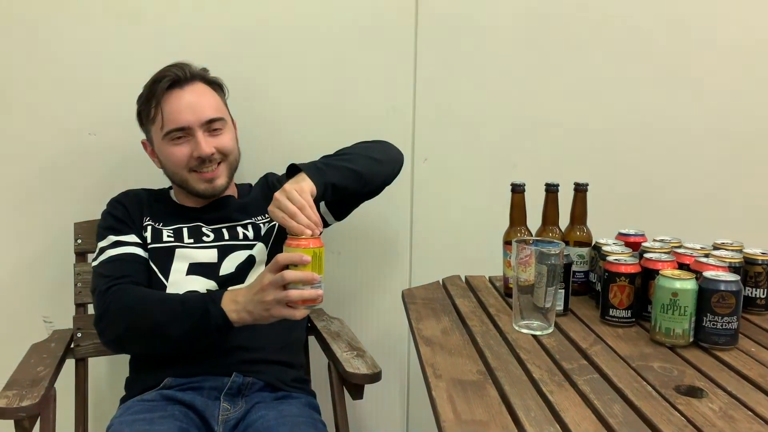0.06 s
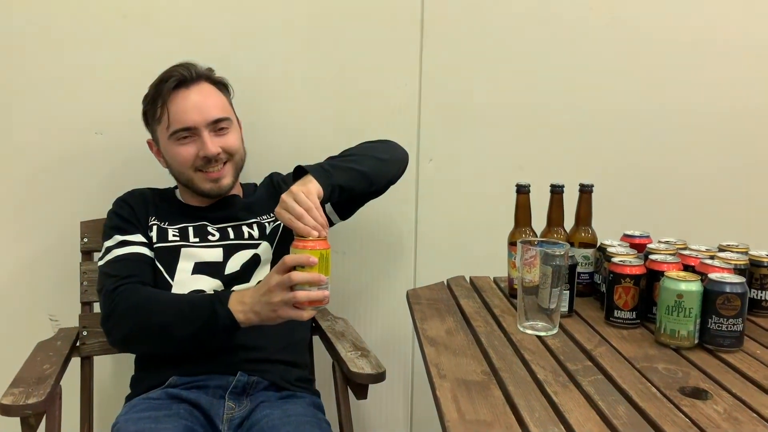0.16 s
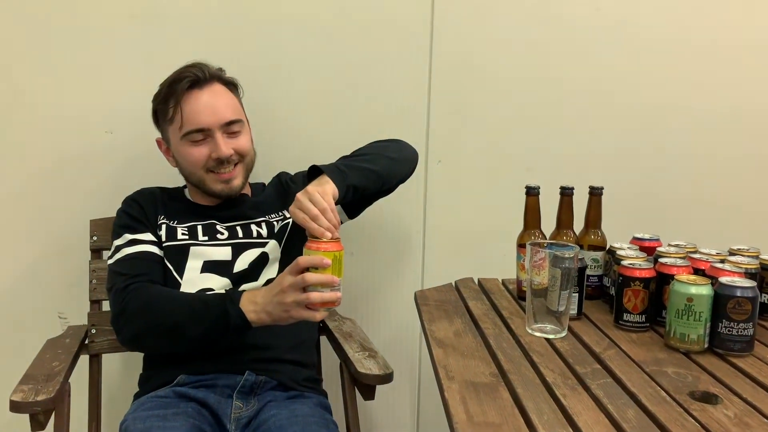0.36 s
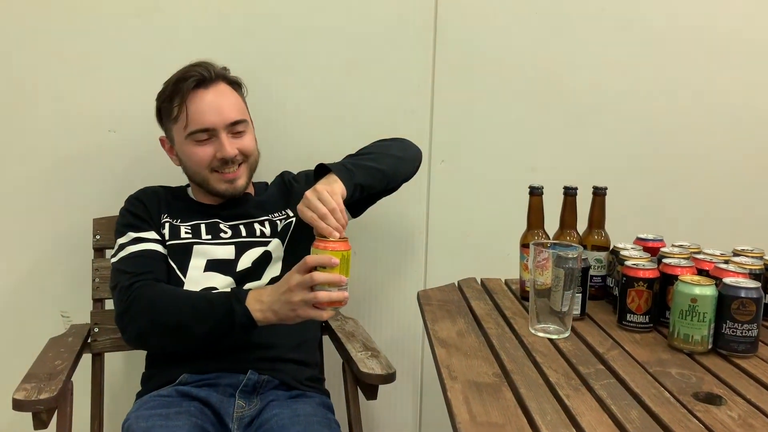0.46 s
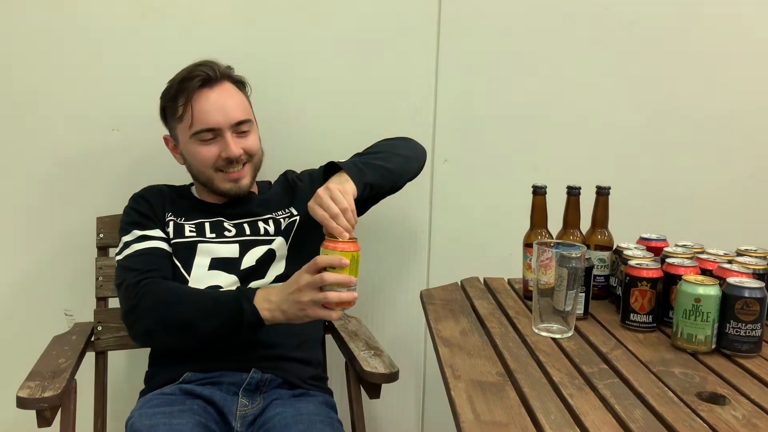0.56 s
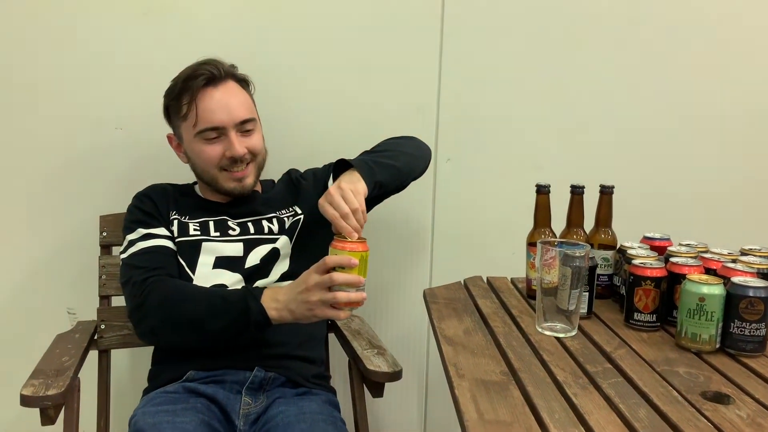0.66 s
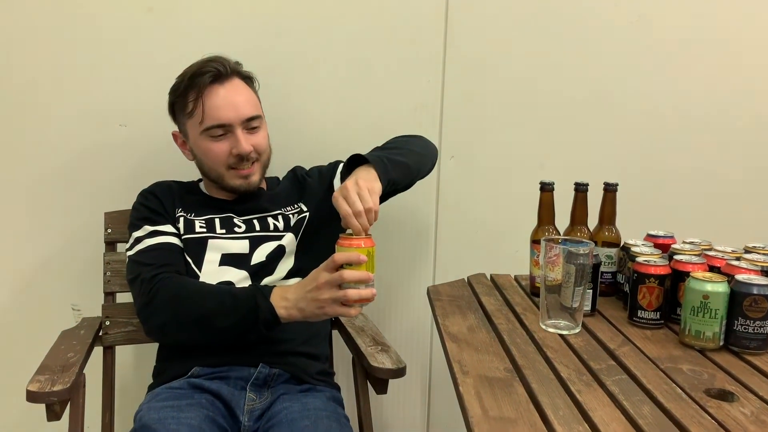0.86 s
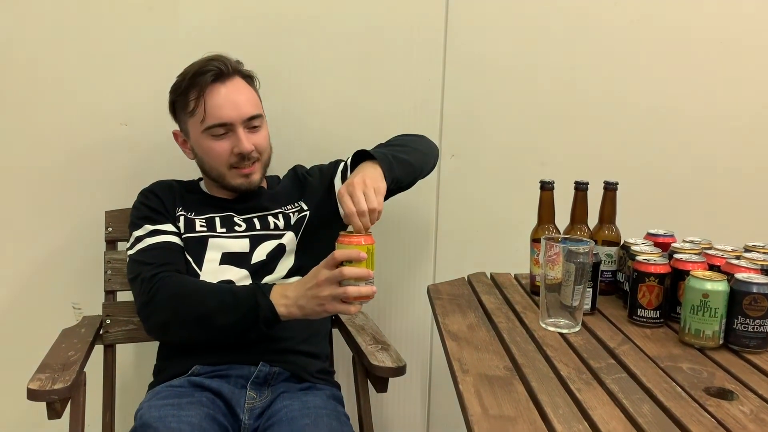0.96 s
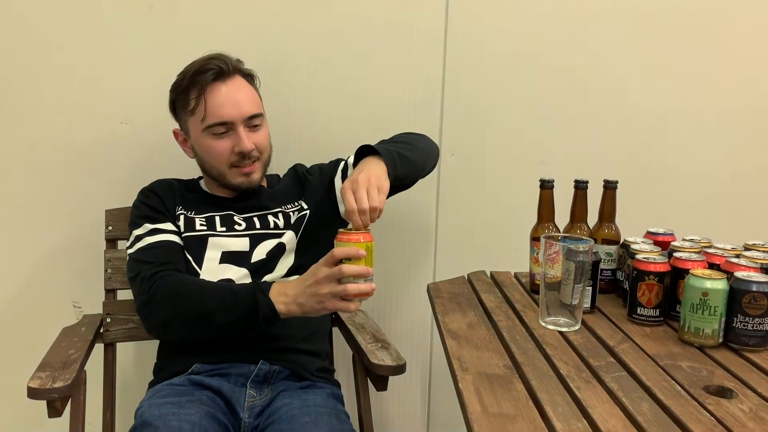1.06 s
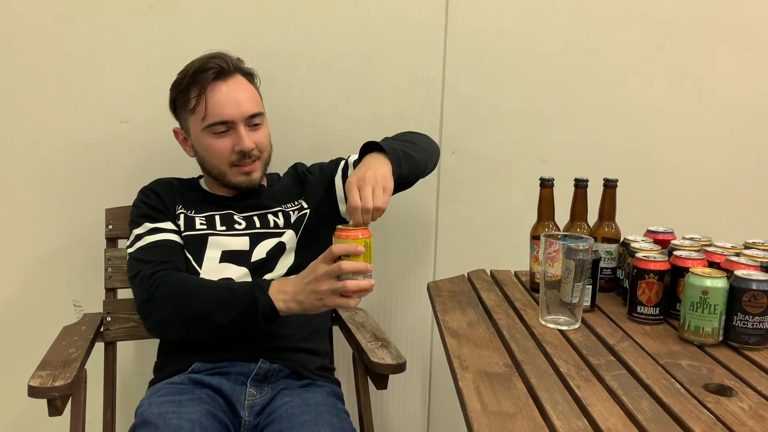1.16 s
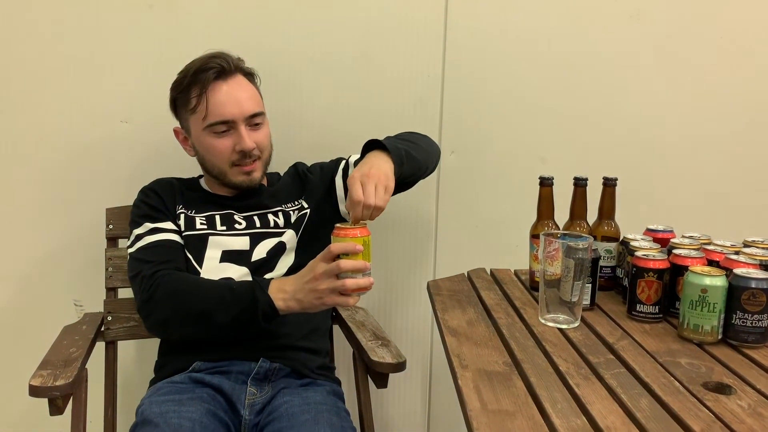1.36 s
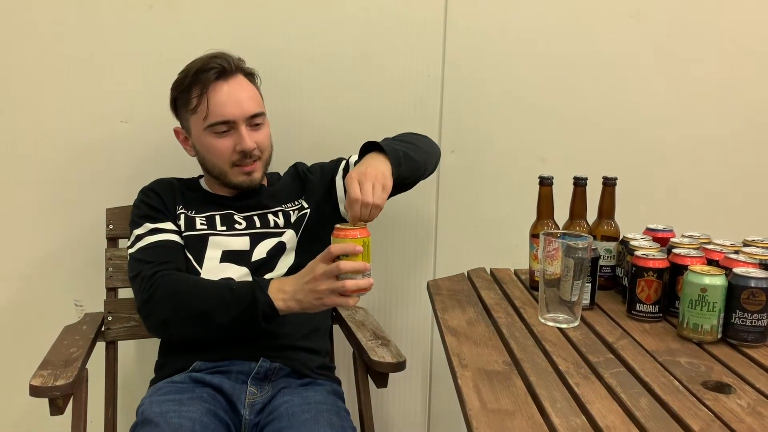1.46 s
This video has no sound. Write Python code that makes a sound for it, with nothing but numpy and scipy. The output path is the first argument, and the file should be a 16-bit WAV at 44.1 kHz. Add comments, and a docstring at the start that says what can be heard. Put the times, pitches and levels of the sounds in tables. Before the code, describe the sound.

Drink can cracked open by its tab: click, swelling gas hiss, metallic snaps, ringing echo indoors

```python
"""Opening a drink can in a bare, echoing room

The tab clicks, gas jets through the first slit, the scored lid tears in several cracks and the flap pops in.
Cracks and creaks ring the modes of lid and can; jet and closing rush of gas are shaped noise.
Two faint ticks follow. Early echoes, a noise-like tail, room air, rumble and mains hum surround the can,
and a two-port microphone nearby hears it all in stereo.
"""
import sys
import numpy as np
from scipy import signal
from scipy.fft import rfft, irfft
from scipy.io import wavfile

SR = 44100
rng = np.random.default_rng(int(sys.argv[2]) if len(sys.argv) > 2 else 0)


def dump_mix(stems):
    """Bounce the given channels to the path in sys.argv[1] as a 16-bit WAV at rate SR."""
    frames = np.atleast_2d(stems).T  # one column per channel
    limited = np.clip(frames, -1, 1)  # hard clip at full scale
    pcm = np.round(limited * 32767).astype(np.int16)
    wavfile.write(sys.argv[1], SR, pcm)


N = 66150

# Ringing modes of lid and can. Each row: pitch in Hz, relative level in dB, t60 in seconds.
LID_MODES = [(309, -2, 0.01), (628, -4, 0.0095), (860, -5.5, 0.011), (1012, 0, 0.0092), (1196, -3, 0.015),
             (1717, 4, 0.0036), (2365, 6.5, 0.0072), (2780, -6, 0.011), (3205, 5.5, 0.0056),
             (3582, 1, 0.0092), (4077, 1.5, 0.0074), (4550, -0.5, 0.0092), (5187, 5, 0.005),
             (6055, 0, 0.0089), (6670, 7.5, 0.0034), (7460, 6, 0.0039), (8430, 14, 0.0027),
             (9600, 6, 0.0046), (11050, 21, 0.0017), (12600, 13.5, 0.0026), (14350, 3.5, 0.01),
             (14220, -0.5, 0.0041), (15400, -13, 0.0025)]
# Swell and ebb of the low rumble, which the hum follows. Each row: time in seconds, level in dB.
RUMBLE_SWELL = [(0.0, -59.5), (0.17, -60.5), (0.422, -65), (0.47, -59), (0.542, -72), (0.952, -70),
                (0.976, -74), (1.186, -72.5), (1.5, -62.5)]
ATTACK_S = 0.00024  # time constant of the onset of cracks and ticks


def amp(db):
    """Turns dB into a gain."""
    return 10 ** (np.asarray(db) / 20)


def evened(x):
    """Brings a sound to an RMS of 1 over all its samples."""
    return x / np.sqrt(np.mean(x ** 2) + 1e-20)


def read(points, hz):
    """Reads a table of values by frequency, in straight lines over log frequency."""
    f, value = np.transpose(points)
    return np.interp(np.log(hz + 1), np.log(f + 1), value)


def coloured(x, points):
    """Shapes a sound by a dB spectrum."""
    gain = amp(read(points, np.fft.rfftfreq(x.shape[-1], 1 / SR)))
    return irfft(rfft(x) * gain, x.shape[-1])


def curve(points):
    """Draws a level curve as gain, as good as silent outside its ends."""
    level_db = np.interp(np.arange(N) / SR, *np.transpose(points), left=-200, right=-200)
    return amp(level_db)


def ring(x, hz, t60):
    """Rings one mode as a two-pole resonator: a click of height 1 rings with height 1."""
    r, w = amp(-60 / (t60 * SR)), 2 * np.pi * hz / SR
    return signal.lfilter([0, np.sin(w)], [1, -2 * r * np.cos(w), r * r], x)


def hum():
    """Mains hum: one steady low sine that rises and falls with the rumble."""
    hum_hz, over_rumble_db = 51.4, -12
    sine = np.sqrt(2) * np.sin(2 * np.pi * hum_hz * np.arange(N) / SR)
    return curve(RUMBLE_SWELL) * amp(over_rumble_db) * sine


def ambience():
    """Two unrelated channels of noise: room air, low rumble and a faint treble band still dying away."""
    # Spectrum of the room air. Each row: frequency in Hz, relative level in dB per Hz.
    air_colour = [(240, -12.5), (400, -18), (994, -18), (1500, -28), (1900, -13.5), (2290, -27),
                  (11600, -49.5), (14400, -31), (16000, -50.5)]
    # Spectrum of the rumble. Each row: frequency in Hz, relative level in dB.
    rumble_colour = [(15, -13), (33, -6.5), (55, 5.5), (100, -12), (200, -10.5), (400, -20.5), (800, -35)]
    air_db = -70.5
    treble_hz, treble_width_hz, treble_db, treble_t60_s = 5670, 1630, -53, 0.43
    t = np.arange(N) / SR

    rumble = curve(RUMBLE_SWELL) * evened(coloured(rng.standard_normal((2, N)), rumble_colour))
    edges = [treble_hz - treble_width_hz / 2, treble_hz + treble_width_hz / 2]
    band = signal.butter(N=2, Wn=edges, btype="band", fs=SR)
    treble = evened(signal.lfilter(*band, rng.standard_normal((2, N))))
    treble *= amp(treble_db - 60 * t / treble_t60_s)
    air = amp(air_db) * evened(coloured(rng.standard_normal((2, N)), air_colour))
    return air + treble + rumble


def room(x):
    """Reverberates through two unrelated tails of sparse taps, each band dying at its own speed."""
    # Decay before the sag is added. Each row: frequency in Hz, t60 in seconds.
    decay = [(200, 0.28), (500, 1.18), (1500, 1.3), (4500, 1.254), (8000, 0.82), (12000, 0.47),
             (16000, 0.36)]
    # Loudness of the tail. Each row: frequency in Hz, tail over direct sound in dB.
    tail_level = [(200, 0.5), (1000, 3), (3000, -1), (6000, 0), (10000, -2), (15800, -12.5), (16100, -29)]
    build_s = 0.0029
    sag_db = -30.5  # the tail steepens: extra fall after one second, growing with the cube of time

    # one tap of random sign at a random place in every ten samples
    taps = np.zeros((2, SR))
    at = np.arange(200, SR - 10, 10)
    places = at + rng.integers(0, 10, (2, len(at)))
    np.put_along_axis(taps, places, rng.choice([-1., 1.], (2, len(at))), 1)
    taps *= 1 - np.exp(-np.arange(SR) / SR / build_s)

    hz, t, bands = signal.stft(taps, SR, nperseg=256)
    t60 = read(decay, hz)[:, None]
    fall_db = -60 * t / t60 + sag_db * t ** 3
    gain = amp(fall_db + read(tail_level, hz)[:, None]) / np.sqrt(t60)  # evens out long and short decays
    tail = signal.istft(bands * gain, SR, nperseg=256)[1]
    # energy of a tail of these taps, per second of t60
    energy_per_s = np.mean(taps[0, SR // 2:] ** 2) * SR / (6 * np.log(10))
    return signal.fftconvolve(x[None], tail / np.sqrt(energy_per_s), axes=1)[:, :N]


def echoes(can):
    """Early reflections off table, wall and floor: delayed copies with a softened treble."""
    # Each row: delay in seconds, level in dB.
    bounces = [(.0036, -6), (.0070, -11), (.0103, -17), (.0165, -15), (.0235, -15)]
    # Treble loss of the echoes. Each row: frequency in Hz, gain in dB.
    dulling = [(500, 0), (3500, 0), (6000, -4), (9000, -9), (16000, -12)]
    copies = sum(amp(db) * np.roll(can, round(s * SR)) for s, db in bounces)
    return coloured(copies, dulling)


def ports(direct, diffuse):
    """Direct sound reaches both ports with a phase and level difference; diffuse sound is only partly alike."""
    # Each row: frequency in Hz, likeness of the diffuse sound at the two ports, 1 being identical.
    likeness = [(40, 1), (150, 0.91), (300, 0.96), (800, 0.23), (6000, 0.049), (9000, 0.21), (10500, 1),
                (16000, 1)]
    # Each row: frequency in Hz, phase by which the right port leads in radians.
    phase_lead = [(0, 0), (2000, -.5), (4000, -1.5), (5500, -2.1), (7200, -3.1), (9000, 0), (11200, 3.1),
                  (13500, 6.3), (16500, 10.5)]
    # Each row: frequency in Hz, left over right in dB.
    balance = [(300, 0.3), (1200, 2), (3000, 1.5), (6000, 0), (9000, -1.5), (14000, 0.5)]
    hz = np.fft.rfftfreq(N, 1 / SR)
    same = np.clip(read(likeness, hz), 0, 1)
    a, b = rfft(diffuse)
    near = rfft(direct)
    # each port takes half of the phase and level difference
    turn = np.exp(.5j * np.interp(hz, *np.transpose(phase_lead)))
    tilt = amp(read(balance, hz) / 2)
    left = (near + a) * tilt / turn
    right = (near + same * a + np.sqrt(1 - same ** 2) * b) * turn / tilt
    return irfft(np.array([left, right]), N)


def ticks():
    """Bent metal settles in faint late ticks: each is one short high ring with a bright snap of noise."""
    # Each row: start in seconds, pitch in Hz, level before the onset ramp in dB.
    settling = [(1.2384, 5300, -25), (1.3272, 10600, -44)]
    # Spectrum of the snap. Each row: frequency in Hz, gain in dB.
    snap_colour = [(3000, -30), (6500, 4), (9000, -6), (14000, -16), (16000, -30)]
    t60_s, snap_db = .008, -13
    out, t = np.zeros(N), np.arange(1024) / SR
    for s, hz, db in settling:
        shape = (1 - np.exp(-t / ATTACK_S)) * amp(db - 60 * t / t60_s)
        snap = amp(snap_db) * coloured(rng.standard_normal(len(t)), snap_colour)
        out[round(s * SR):][:len(t)] += shape * (np.sin(2 * np.pi * hz * t) + snap)
    return out


def creak():
    """The tab strains the score line: dense tiny slips of uneven size ring the lid's modes."""
    # Swell of the creaking. Each row: time in seconds, level in dB.
    strain = [(.208, -94), (.216, -54.5), (.228, -32.5), (.24, -36), (.27, -37.5), (.31, -42), (.41, -64),
              (.432, -31.5), (.446, -21.5), (.46, -37.5), (.48, -33), (.50, -42.5), (.55, -62)]
    # Spectrum laid over the ringing. Each row: frequency in Hz, gain in dB.
    strain_colour = [(1000, -30), (2500, -22), (4300, 7.5), (6000, -3.5), (8000, -18.5), (10000, -47)]
    slips_per_s, spread_db = 1700, 1
    sizes = amp(spread_db * np.minimum(rng.exponential(1, N), 5))
    slips = sizes * (rng.random(N) < slips_per_s / SR)
    slips *= rng.choice([-1., 1.], N)
    # neighbouring modes ring with opposite signs
    lid = sum((-1) ** k * amp(db) * ring(slips, hz, t60) for k, (hz, db, t60) in enumerate(LID_MODES))
    return curve(strain) * evened(coloured(lid, strain_colour))


def jet():
    """Gas hisses through the slit: bright turbulent noise that swells as the slit works open."""
    # Each row: time in seconds, level in dB.
    swell = [(0.233, -94), (.233, -28), (.243, -33), (.26, -50.5), (.30, -28), (.338, -20), (.366, -18.5),
             (0.391, -17.5), (.425, -20), (.446, -20), (.46, -28.5), (.475, -39), (.50, -81), (.53, -85)]
    # Spectrum of the hiss. Each row: frequency in Hz, relative level in dB.
    hiss_colour = [(300, -45), (1000, -33), (2500, -24.5), (3300, -22), (4500, -15), (5800, -10.5),
                   (7500, -10.5), (10000, -7), (13000, -1.5), (15800, 4), (16100, -43.5)]
    return curve(swell) * evened(coloured(rng.standard_normal(N), hiss_colour))


def pop():
    """A short rush of gas leaves the can once the flap is in: noise that jumps up and dies away."""
    # Spectrum of the rush. Each row: frequency in Hz, relative level in dB.
    rush_colour = [(300, -41.5), (600, -6.5), (1000, 9.5), (3000, -37.5), (6000, -2), (9000, -1),
                   (14000, -7)]
    start_s, level_db, t60_s, rise_s = .835, -19.5, 0.056, 0.0017
    t = np.arange(N) / SR - start_s
    rush = evened(coloured(rng.standard_normal(N), rush_colour))
    return np.clip(t / rise_s, 0, 1) * amp(level_db - 60 * np.maximum(t, 0) / t60_s) * rush


def cracks():
    """Each crack is a burst of tearing noise along with the lid's modes, each detuned slightly at random."""
    # Centres in Hz of the eight regions that colour a crack.
    colour_hz = [300, 900, 2300, 2950, 4000, 5500, 9000, 13500]
    # Each row: start in seconds, then the level in dB near each of the eight centres.
    tears = [(.2321, -90, -59, -28.5, -29, -22, -11, -26, -22),
             (.4430, -37, -27, -28.5, -19, -1.5, -21, -59, -46.5),
             (0.463, -64, -68.5, -50, -40.5, -27.5, -43.5, -49.5, -43),
             (0.4654, -71, -75, -41.5, -35, -22.5, -39.5, -42.5, -53),
             (0.469, -27, -29.5, -22, -23, -12.5, -38, -64, -30.5),
             (0.4741, -50.5, -59, -47, -19, -12.5, -45, -60, -47.5),
             (0.4816, -62, -62.5, -52.5, -39.5, -17.5, -48.5, -49, -53.5),
             (0.6719, -49.5, -43.5, -26, -24, -13, -12, -33.5, -8.5),
             (0.8133, -54, -23, -16, -38, -6.5, -24, -25.5, -32),
             (0.8266, -63, -22.5, -36.5, -36, -33, -22, -50, -43.5),
             (.8331, -40, -10.5, -12.5, -7, -12.5, -8.5, -13, -11)]
    snap_db, snap_t60_s = -3.5, 0.021  # ragged noise of the tearing metal
    body_lag_s, body_below_hz = .0004, 7000  # least lag of the low modes, at most doubled by chance
    detune = .015  # greatest shift of a mode, as a share of its pitch
    out, t = np.zeros(N), np.arange(2048) / SR
    onset = (1 - np.exp(-t / ATTACK_S)) ** 2
    for s, *colour_db in tears:
        colour = list(zip(colour_hz, colour_db))
        luck = rng.uniform(-1, 1, len(LID_MODES))
        snap = coloured(rng.standard_normal(len(t)), colour) * amp(snap_db - 60 * t / snap_t60_s)
        out[round(s * SR):][:len(t)] += onset * snap
        for k, (hz, db, t60) in enumerate(LID_MODES):
            lag_s = body_lag_s * (hz < body_below_hz) * (1 + abs(luck[k - 1]))
            at = round((s + lag_s) * SR)
            shape = onset * amp(db + read(colour, hz) - 60 * t / t60)
            tone = np.sin(2 * np.pi * hz * (1 + detune * luck[k]) * t)
            out[at:at + len(t)] += (-1) ** k * shape * tone
    return out


def scene():
    """The can sounds in the room, directly, by echoes and by the tail, amid the ambience."""
    # a small can sends out little bass below 200 Hz
    radiation = signal.butter(N=3, Wn=200, btype="high", fs=SR, output="sos")
    can = signal.sosfilt(radiation, cracks() + creak() + jet() + pop())
    direct = can + echoes(can) + ticks() + hum()
    diffuse = room(can) + ambience()
    return ports(direct, diffuse)


def record(dry):
    """Limits the band: a steep low-pass at 16500 Hz."""
    low_pass = signal.firwin(1023, 16500, window=("kaiser", 12), fs=SR)
    return signal.oaconvolve(dry, low_pass[None], "same")


dry = scene()
out = record(dry)
dump_mix(out)
```